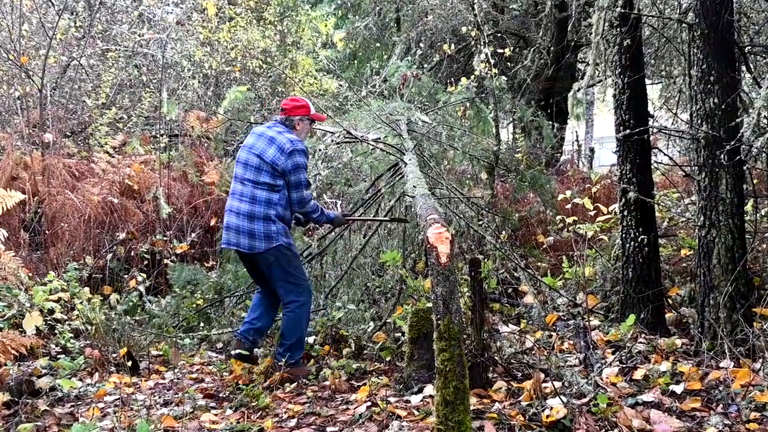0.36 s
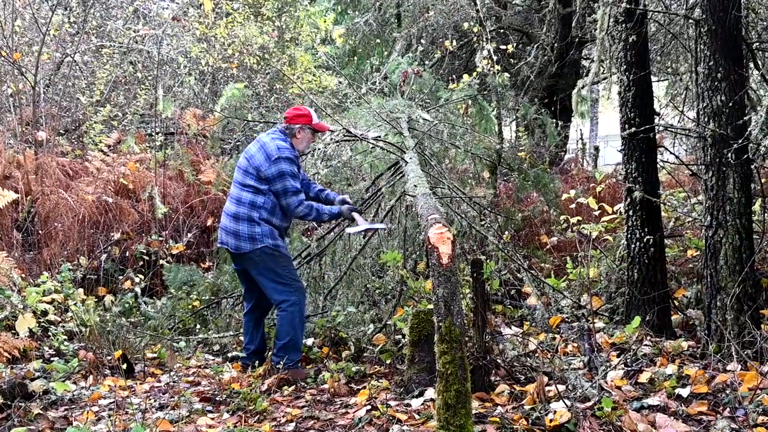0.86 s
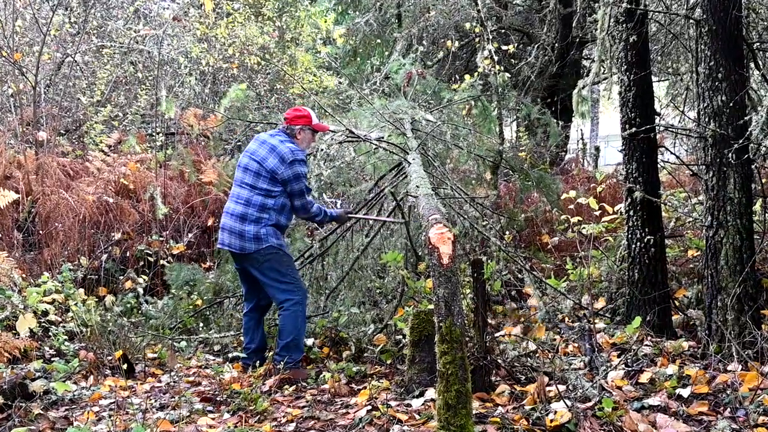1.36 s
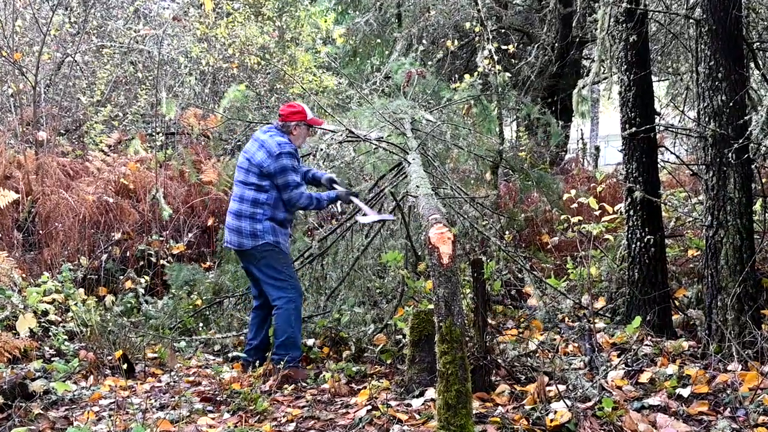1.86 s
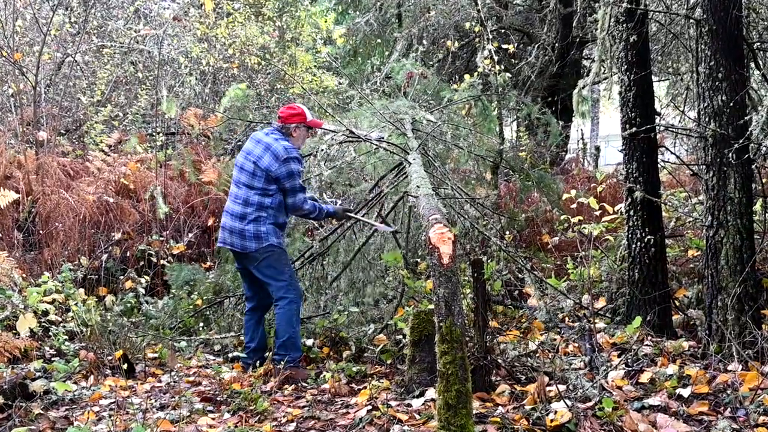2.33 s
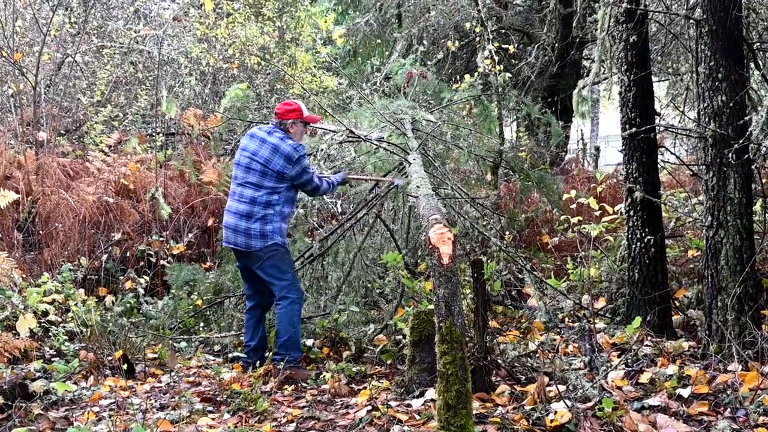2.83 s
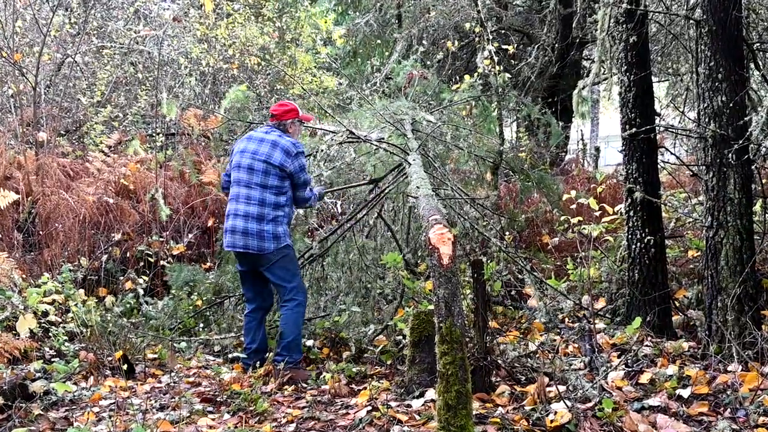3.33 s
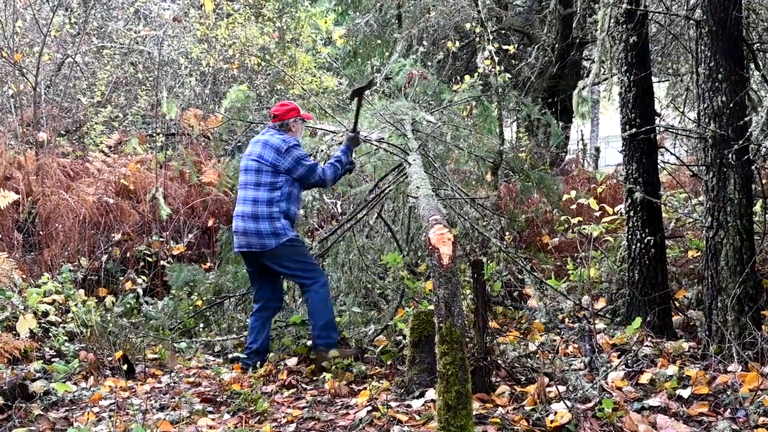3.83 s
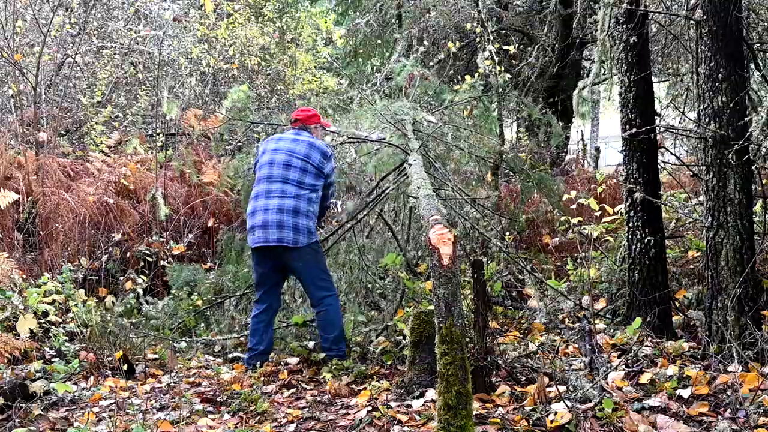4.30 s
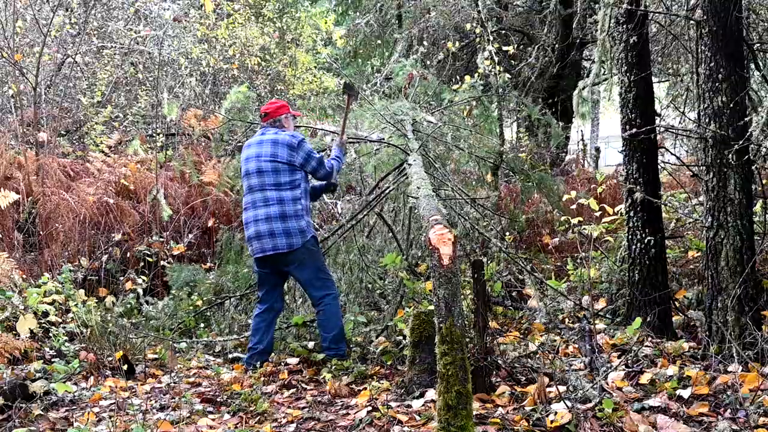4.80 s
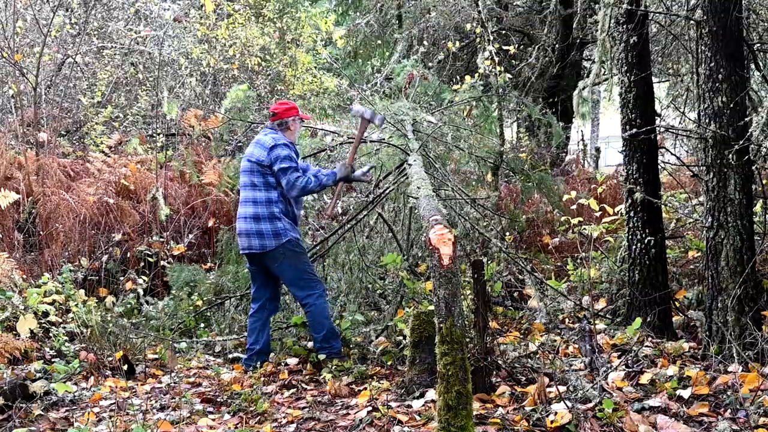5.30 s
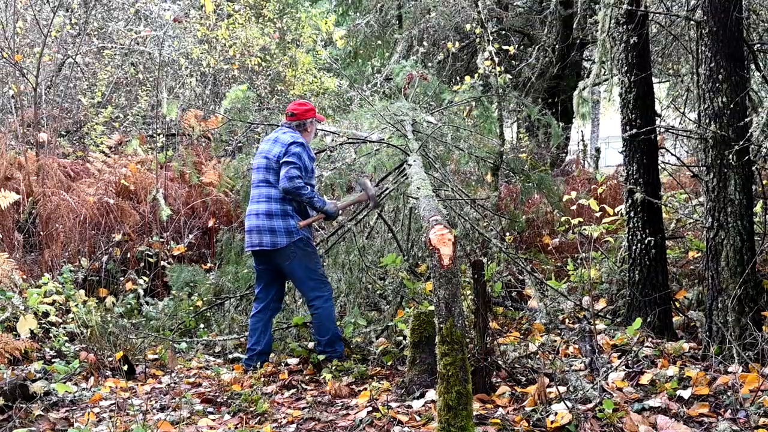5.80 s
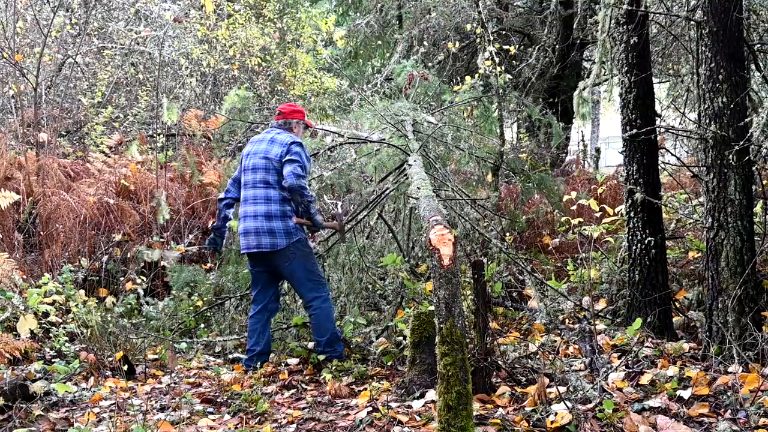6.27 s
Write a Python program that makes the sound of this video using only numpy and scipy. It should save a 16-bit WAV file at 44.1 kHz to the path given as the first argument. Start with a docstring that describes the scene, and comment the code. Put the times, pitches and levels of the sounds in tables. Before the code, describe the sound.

Axe blows bite and snap branches off a felled conifer in damp woods, with twig knocks, rustling needles and a faint steady hush between strokes.

```python
"""In a damp wood an axe lops branches off a felled conifer, some metres away.
Each blow is a dull bite, built from stick-slip pulses, then bright snaps: short swings with a click.
Nearby scatter and the shiver of needles after each snap are decaying coloured noise. Twigs knock and
crack likewise; needles and leaves rustle as countless tiny grains. A far bird, narrow bands of noise,
peeps over a steady noise hush."""
import sys
import numpy as np
from scipy import signal
from scipy.fft import rfft, irfft
from scipy.io import wavfile
from scipy.ndimage import uniform_filter1d

SR = 44100
rng = np.random.default_rng(int(sys.argv[2]) if len(sys.argv) > 2 else 0)


def output_pcm(signal):
    """Save a mono or channel-first signal as 16-bit PCM at the path in sys.argv[1].

    Samples are clipped to [-1, 1] before scaling.
    """
    pcm = np.clip(np.atleast_2d(signal).T, -1, 1) * 32767
    wavfile.write(sys.argv[1], SR, np.round(pcm).astype(np.int16))


def gain_from_decibels(decibels):
    """Convert decibel values to linear amplitude factors."""
    exponent = np.asarray(decibels, float) / 20
    return 10 ** exponent


N = 282298  # length in samples

# Spectrum of the hush of the wood: f/Hz, level/dB
HUSH_SPECTRUM = [(15, -64), (25, -66), (117, -3), (185, -4.5), (344, -2.5), (427, -3.5), (734, 2.5),
                 (1400, -6), (3340, -13), (8830, -19.5), (14400, -17.5), (16000, -25)]
# Faint far bird calls: t/s, length/s, f/Hz, level/dB, width/Hz
BIRD_CALLS = [(5.004, 0.094, 3455, -59.5, 16), (5.478, 0.094, 3480, -59, 16), (5.501, 0.26, 1440, -60, 15),
              (5.48, 0.37, 1670, -59, 35)]
# Hiss of each microphone: f/Hz, level/dB
HISS_SPECTRUM = [(40, -8), (500, -1.5), (1500, -8), (4000, -11), (9000, -5), (16000, -3.5)]
# Boughs and leaves moved by hands and feet: t/s, level/dB
HANDLING = [(0.0, -41), (0.08, -43), (0.16, -49.5), (0.32, -44), (0.48, -50.5), (0.64, -41.5),
            (0.72, -47.5), (0.82, -49), (0.96, -59), (1.55, -52), (1.92, -50.5), (2.0, -54), (2.62, -53.5),
            (2.86, -57), (3.15, -48), (3.28, -56), (3.44, -52), (3.6, -54.5), (3.68, -43), (3.76, -47),
            (3.84, -37), (3.93, -35.5), (4.0, -48.5), (4.4, -62), (4.64, -52.5), (4.85, -61.5), (5.06, -56),
            (5.3, -59.5), (5.44, -54.5), (5.56, -60), (5.75, -52.5), (5.92, -52.5), (6.0, -49), (6.1, -60),
            (6.4, -59)]
# Needles shaken by each blow and by one brush of the lifted axe: t/s, level/dB, fall/(dB/s)
NEEDLE_SHAKES = [(1.06, -42.5, 42), (2.015, -44.5, 34), (2.82, -70, 16), (4.11, -63, 61), (5.14, -56, 97)]
# Share of the extra brightness that each pitch of the shaken needles gets: f/Hz, share
SHAKE_BRIGHTNESS = [(500, -0.67), (1800, 0.32), (4500, 1), (14000, -0.24)]
# Spectrum of needles and leaves: f/Hz, level/dB
RUSTLE_SPECTRUM = [(35, -85), (60, -55), (130, -19), (217, -1), (417, -5.5), (458, -4), (1060, -4.5),
                   (1310, -4.5), (4030, -5), (16000, -31)]
# Clearest knocks and cracks of twigs: t/s, level/dB, f/Hz, treble click/dB, scatter/dB
TWIG_KNOCKS = [(0.1212, -9.5, 2570, 2, -9), (0.4266, -32.5, 2320, -21, -3), (0.6695, -21.5, 2930, -17, -11),
               (0.6782, -40, 5000, -24, 10), (0.7595, -33, 2630, 0, 0.5), (0.8114, -30.5, 4140, -33, -11),
               (1.1097, -13, 2240, -18, 0.5), (1.1827, -36, 3770, -14, -8), (1.4193, -27.5, 2500, -32, -5),
               (1.8986, -32.5, 1420, -25, -0.5), (1.9222, -33.5, 1710, 4, -2), (2.119, -27, 3140, -20, 5),
               (2.299, -15.5, 4000, -2, -1), (2.468, -36, 5100, -12, -3), (2.6508, -34.5, 2850, -26, 1),
               (2.7127, -35, 4000, -30, 2), (2.898, -36, 1120, -21, 4), (3.1443, -25.5, 2730, -8, 2),
               (3.341, -38, 4200, 0, 1.5), (3.3732, -36, 4970, -20, -2), (3.4005, -37.5, 3180, -20, 4),
               (3.4335, -38.5, 2130, -24, -3), (3.5825, -40, 696, -16, -1), (3.6275, -15, 3700, -24, -6),
               (3.7842, -30, 3070, -1, 2), (3.8185, -25, 2100, -16, -2), (3.8731, -27, 3570, -25, 5),
               (3.9617, -16.5, 4260, -13, -2.5), (4.0962, -40, 1400, -24, -8),
               (4.138, -21.5, 2880, -0.5, 1), (4.461, -38, 4960, 8, -11), (4.5882, -24, 1880, -37, -2.5),
               (4.9073, -38, 2500, -7, 1), (5.5181, -44, 5500, 5, -1), (5.6552, -35.5, 5540, 5, -3),
               (5.6825, -31, 1960, -19, -20), (5.7154, -23.5, 5250, -1.5, -1.5),
               (5.7898, -33, 3000, 0, 2.5), (5.8299, -25.5, 1870, -3.5, -2.5),
               (5.8333, -28.5, 1490, -19, -2), (5.8366, -32, 2600, -2, 1), (5.8429, -30, 1400, -20, -18),
               (5.8546, -29, 750, -8, -0.5), (5.8643, -21, 990, -3.5, -10), (5.887, -20.5, 1250, -12, -11),
               (5.8883, -25.5, 2460, -1, -6), (6.0082, -38, 650, -1, -2), (6.0586, -28.5, 1290, -3, -9.5),
               (6.1136, -43, 5300, 11, 3), (6.3272, -38.5, 2630, -15, -10)]
# Low thuds of heavier boughs: t/s, level/dB
BOUGH_THUDS = [(0.1213, -15.5), (0.6699, -29.5), (0.7601, -35.5), (1.1825, -33), (1.9225, -46),
               (3.6274, -30), (3.8185, -32), (3.8731, -29.5), (3.9617, -30.5), (4.1386, -28)]
# Resonances of the boughs in the near scatter: f/Hz, width/Hz, level/dB
BOUGH_MODES = [(520, 690, 14), (1250, 300, 12.5), (2270, 210, 13), (2960, 660, 12.5), (5030, 430, 4),
               (6000, 500, 6.5)]
# Decay of the scatter off near boughs: f/Hz, t60/s
SCATTER_DECAY = [(100, 0.042), (500, 0.077), (1500, 0.092), (3500, 0.13), (8000, 0.23), (16000, 0.06)]
# Decay of the shiver of needles after a snap: f/Hz, t60/s
SHIVER_DECAY = [(300, 0.22), (1200, 2.4), (3500, 1.33), (7000, 1.01), (12000, 0.4)]
# Spectrum of the shiver of needles after a snap: f/Hz, level/dB
SHIVER_SPECTRUM = [(120, -65), (200, -26), (305, -42), (360, -31), (491, -6), (558, -15), (623, -9),
                   (950, -11), (3620, 0.5), (8120, -6), (16000, -24)]
# Dull ring of the axe head: f/Hz, width/Hz, level/dB
AXE_HEAD_MODES = [(2700, 300, -6), (3470, 280, 0)]
# Blade bites: t/s, level/dB, wood f/Hz, number of the slip where the edge jams hardest,
# thud of the trunk/dB, ring of the axe head/dB
BLADE_BITES = [(1.0540, -0.5, 1610, 1.25, -28, -40.5), (2.0072, -1.5, 1160, 1.36, -12, -35.5),
               (2.8115, -3.5, 1100, 0.87, -17.5, -43.5), (4.1040, -14, 1510, 2.3, -4, -55)]
# Branch snaps: t/s, level/dB, f/Hz, treble click/dB, scatter/dB, shiver of needles/dB
BRANCH_SNAPS = [(1.0613, -1.5, 5100, -1.5, -0.5, -21.5), (2.0146, 2, 3950, -14.5, -4.5, -25),
                (2.8172, -1, 3270, -5, -6, -31.5), (4.1099, -9.5, 3120, -11, -2.5, -44),
                (4.112, -5.5, 5050, 2.5, -8, -36.5), (4.1131, -24, 3520, -1, -13, -36.5)]


def evened(x):
    """Scales to rms 1."""
    return x / np.sqrt(np.mean(x ** 2) + 1e-20)


def read(points, hz):
    """Reads a table along log frequency."""
    f, value = np.transpose(points)
    return np.interp(np.log(hz + 1), np.log(f + 1), value)


def add(mix, s, sound):
    """Mixes a sound in at a time in seconds."""
    part = mix[round(s * SR):][:len(sound)]
    part += sound[:len(part)]


def resonate(x, hz, width):
    """A resonance of gain about 1 at its centre."""
    pole = np.exp((2j * np.pi * hz - np.pi * width) / SR)
    return 2 * signal.lfilter([1 - abs(pole)], [1, -pole], x).real


def shape(x, field_db):
    """Colours a sound by a rule field_db(Hz, s) on its short-time spectra."""
    hz, t, z = signal.stft(x, SR, nperseg=256, noverlap=192)
    coloured = z * gain_from_decibels(field_db(hz[:, None], t))
    return signal.istft(coloured, SR, nperseg=256, noverlap=192)[1][:len(x)]


def wavelet(hz, cycles):
    """A brief swing at one pitch with a rounded start and no lasting push, peak 1."""
    turns = np.arange(700) / SR * hz
    bell = turns ** 2 * np.exp(-3 * turns / cycles)
    swing = np.sin(2 * np.pi * turns) * bell
    swing -= bell * swing.sum() / bell.sum()
    return swing / abs(swing).max()


def hush():
    """The steady hush of the wood: smooth noise with slight drifting patches."""
    frames, hz = N // 256 + 5, np.fft.rfftfreq(1024, 1 / SR)
    a, b, patches = rng.standard_normal((frames, 513, 3)).T
    patches = evened(uniform_filter1d(uniform_filter1d(patches, 14, 0), 14, 1))
    level_db = read(HUSH_SPECTRUM, hz)[:, None] + 0.4 * patches
    noise = signal.istft((a + 1j * b) * gain_from_decibels(level_db), nperseg=1024, noverlap=768)[1][:N]
    return gain_from_decibels(-56) * evened(noise)


def microphone_hiss():
    """Faint coloured noise of the microphones themselves."""
    colour = gain_from_decibels(read(HISS_SPECTRUM, np.fft.rfftfreq(N, 1 / SR)))
    return gain_from_decibels(-73) * evened(irfft(rfft(rng.standard_normal(N)) * colour, N))


def bird():
    """Fuzzy far whistles: noise through narrow resonances, faded in and out."""
    out = np.zeros(N)
    for s, length, hz, db, width in BIRD_CALLS:
        tone = resonate(rng.standard_normal(SR // 2), hz, width)[:round(length * SR)]
        add(out, s, gain_from_decibels(db) * evened(tone) * signal.windows.tukey(len(tone), 0.4))
    return out


def stirring(hz, t):
    """Level of the rustle in dB: slow handling, plus the brighter rustle of shaken needles."""
    rise_s, bright_db = 0.02, 9.5
    shaking = 0
    for s, db, fall in NEEDLE_SHAKES:
        late = np.maximum(t - s, 0)
        shaking = shaking + (gain_from_decibels(db - fall * late) * np.minimum(late / rise_s, 1)) ** 2
    handling = gain_from_decibels(np.interp(t, *np.transpose(HANDLING))) ** 2
    brightness = gain_from_decibels(bright_db * read(SHAKE_BRIGHTNESS, hz)) ** 2
    return 10 * np.log10(handling + shaking * brightness)


def rustle():
    """Countless tiny cracks of needles and leaves over their blurred sum."""
    grains_per_s, spread_db, smooth = 4000, 3.9, 0.9
    size = gain_from_decibels(spread_db * np.minimum(rng.exponential(1, N), 5))
    size *= rng.random(N) < grains_per_s / SR
    kind, grains = rng.integers(0, 16, N), np.zeros(N)
    for k, hz in enumerate(np.geomspace(300, 14000, 16)):
        grains += signal.oaconvolve(size * (kind == k), wavelet(hz, 1.2) * hz)[:N]
    mix = evened(grains) + smooth * rng.standard_normal(N)
    flat = evened(shape(mix, lambda hz, t: read(RUSTLE_SPECTRUM, hz)))
    return shape(flat, stirring)


def thud():
    """The low, dull swing of a thick bough."""
    return 0.88 * wavelet(520, 0.84) + wavelet(850, 1.0)


def crack(hz, click_db, thud_db, cycles=0.7):
    """A short swing at the pitch of the wood with one overtone, a sharp click and a low thud."""
    fade = np.exp(-np.arange(700) / SR / 0.00043)
    click = resonate(rng.standard_normal(700), 4700, 4200) * fade
    wood = wavelet(hz, cycles) - 0.5 * wavelet(1.6 * hz, cycles)
    return wood + gain_from_decibels(click_db) * click / abs(click).max() + gain_from_decibels(thud_db) * thud()


def scatter(x):
    """Near boughs and ground throw a sound back in a dense spray that rings with the wood."""
    noise = rng.standard_normal(SR // 5)
    ring = sum(gain_from_decibels(db) * resonate(noise, hz, width) for hz, width, db in BOUGH_MODES)
    spray = shape(evened(ring) + 1.04 * noise, lambda hz, t: -60 * t / read(SCATTER_DECAY, hz))
    t = np.arange(len(spray)) / SR
    # The nearest twigs answer first and loudest
    spray *= np.minimum(t / 0.00092, 1) * (1 + 2.55 * np.exp(-t / 0.0041))
    return signal.fftconvolve(x, spray / np.linalg.norm(spray))


def twigs():
    """Each knock is a crack with its own share of scatter; heavier boughs add a thud."""
    out = np.zeros(N)
    for s, db, hz, click_db, scatter_db in TWIG_KNOCKS:
        sound = gain_from_decibels(db) * crack(hz, click_db, thud_db=-48)
        add(out, s, sound)
        add(out, s, gain_from_decibels(scatter_db) * scatter(sound))
    for s, db in BOUGH_THUDS:
        add(out, s, gain_from_decibels(db) * thud())
        add(out, s, gain_from_decibels(db - 9) * scatter(thud()))
    return out


def needle_shiver():
    """Shiver of needles after a snap: coloured noise that swells, then dies at a rate set by pitch."""
    patchy_db = 2.5
    noise = rng.standard_normal(SR * 3 // 2)
    patches = rng.standard_normal((129, 1100))
    patches = evened(uniform_filter1d(uniform_filter1d(patches, 8, 0), 14, 1))

    def field_db(hz, t):
        """Colour and decay, made uneven by random patches."""
        decay_db = -60 * t / read(SHIVER_DECAY, hz)
        return read(SHIVER_SPECTRUM, hz) + decay_db + patchy_db * patches[:, :len(t)]

    tail = shape(noise, field_db)
    t = np.arange(len(tail)) / SR
    tail *= 0.5 + 0.55 / (1 + np.exp(-(t - 0.095) / 0.008))  # swells about 0.1 s in
    return tail / np.linalg.norm(tail) * np.sqrt(SR / 100)


def steel():
    """The axe head and bough keep up a fuzzy ring: noise passed twice through each resonance."""
    t60_s = 1.3
    noise = rng.standard_normal(SR)
    ring = sum(gain_from_decibels(db) * resonate(resonate(noise, hz, width), hz, width)
               for hz, width, db in AXE_HEAD_MODES)
    return evened(ring) * gain_from_decibels(-60 * np.arange(SR) / SR / t60_s)


def bite(db, hz, jam, thud_db):
    """The edge sticks and slips through the fibres: dull uneven pulses over the thud of the trunk."""
    slips, slip_ms = 5, 1.6
    out = np.zeros(1500)
    for k, (late, louder, higher) in enumerate(rng.standard_normal((slips, 3))):
        force_db = louder - min(5 * (k - jam) ** 2, 10)
        pulse = gain_from_decibels(force_db) * wavelet(hz * (1 + 0.08 * higher), 0.45)
        add(out, (k * slip_ms + 0.18 * abs(late)) / 1000, -pulse)
    trunk = 0.66 * wavelet(91, 0.2) + 0.97 * wavelet(330, 0.74) + 0.7 * wavelet(500, 0.8)
    add(out, 0.001, gain_from_decibels(thud_db) * trunk)
    return gain_from_decibels(db) * out


def axe():
    """Bites with near scatter and a steel ring; snaps with near scatter and a shiver of needles."""
    out = np.zeros(N)
    for s, db, hz, jam, thud_db, ring_db in BLADE_BITES:
        sound = bite(db, hz, jam, thud_db)
        add(out, s, sound)
        add(out, s, gain_from_decibels(-7.5) * scatter(sound))
        add(out, s + 0.0077, gain_from_decibels(ring_db) * steel())
    for s, db, hz, click_db, scatter_db, shiver_db in BRANCH_SNAPS:
        sound = gain_from_decibels(db) * crack(hz, click_db, thud_db=-27, cycles=1.3)
        add(out, s, sound)
        add(out, s, gain_from_decibels(scatter_db) * scatter(sound))
        add(out, s, gain_from_decibels(shiver_db) * needle_shiver())
    return out


def scene():
    """All sources reach two close microphones alike; only the faint hiss differs between them."""
    mid = hush() + bird() + rustle() + twigs() + axe()
    side = microphone_hiss()
    return np.array([mid + side, mid - side])


def band_limit(x):
    """A steep low-pass at the top of the band."""
    return signal.sosfilt(signal.butter(12, 16660, fs=SR, output="sos"), x)


def record(dry):
    """The microphone drops the deep bass, peaks clip at full scale and the top is cut."""
    thin = signal.lfilter(*signal.butter(1, 50, "high", fs=SR), dry)
    clipped = np.clip(thin, -1, 1)
    top_cut = signal.firwin(511, 16150, window=("kaiser", 9), fs=SR)[None]
    finished = signal.oaconvolve(clipped, top_cut, "same")
    return band_limit(finished)


dry = scene()
out = record(dry)
output_pcm(out)
```